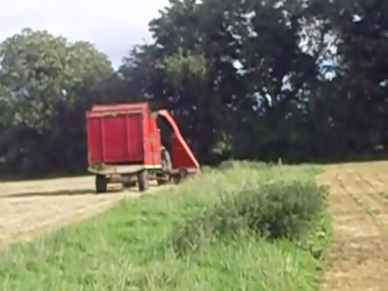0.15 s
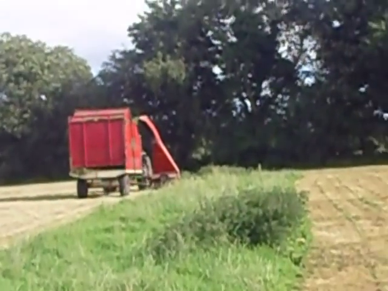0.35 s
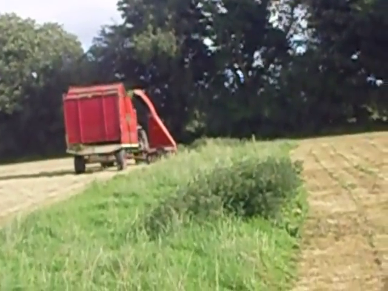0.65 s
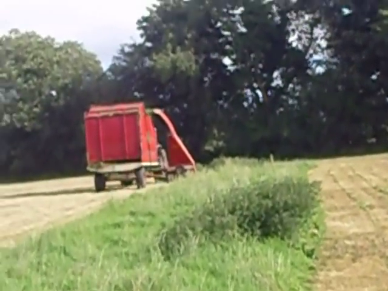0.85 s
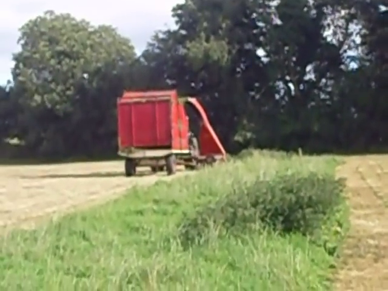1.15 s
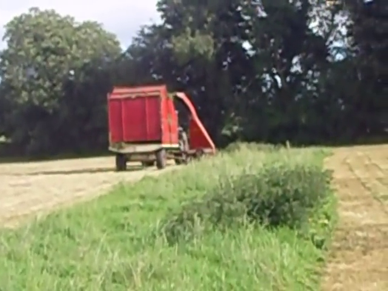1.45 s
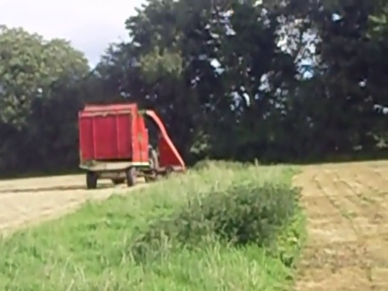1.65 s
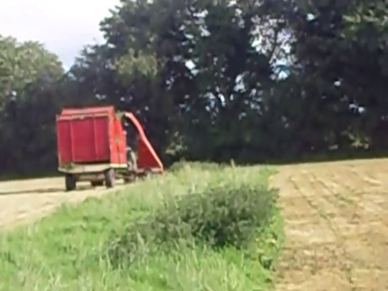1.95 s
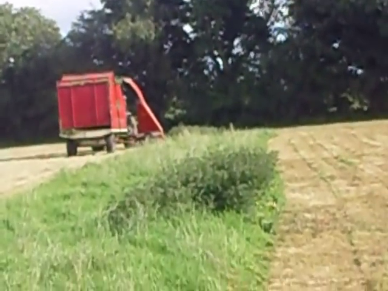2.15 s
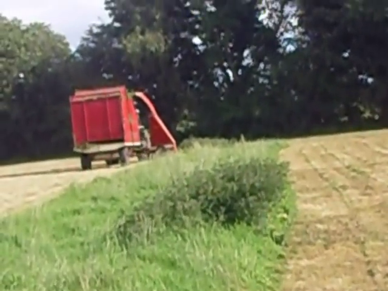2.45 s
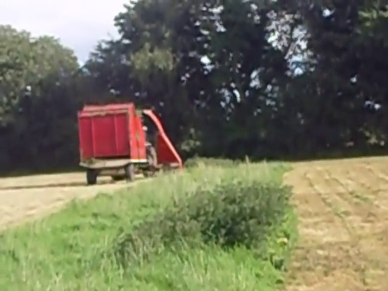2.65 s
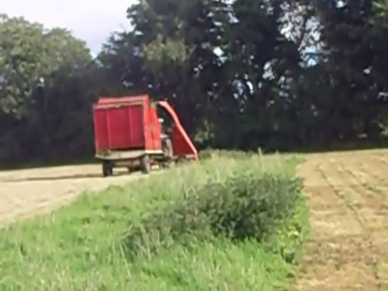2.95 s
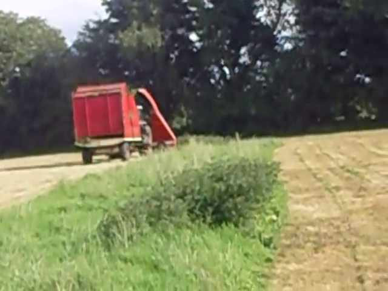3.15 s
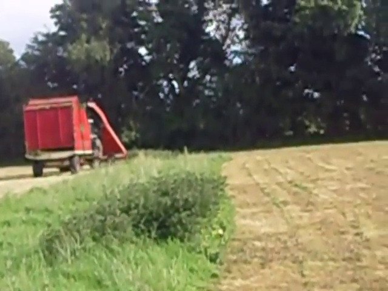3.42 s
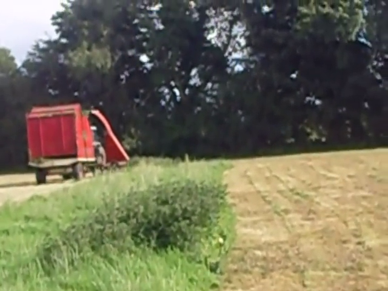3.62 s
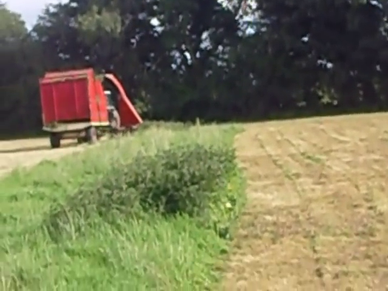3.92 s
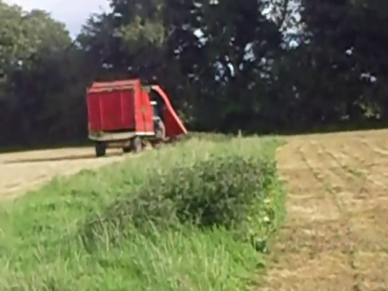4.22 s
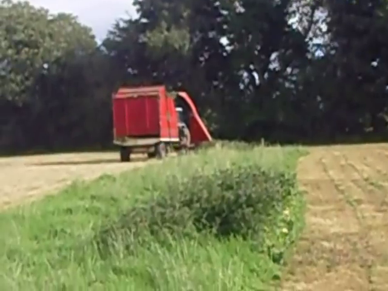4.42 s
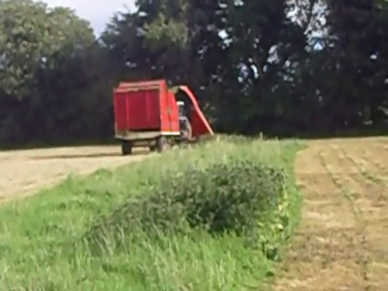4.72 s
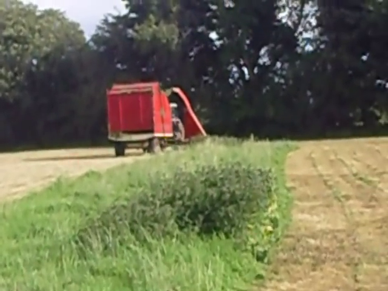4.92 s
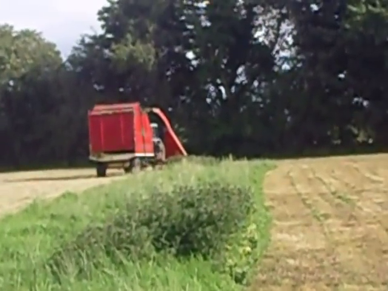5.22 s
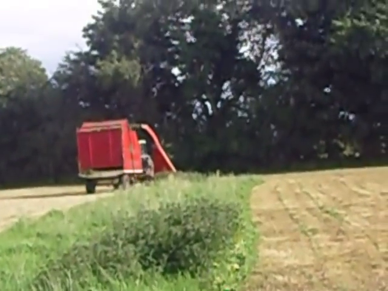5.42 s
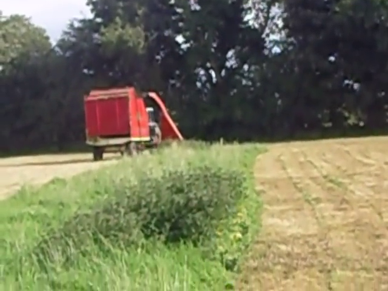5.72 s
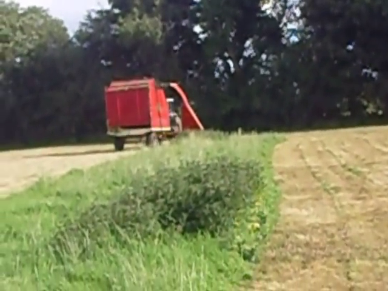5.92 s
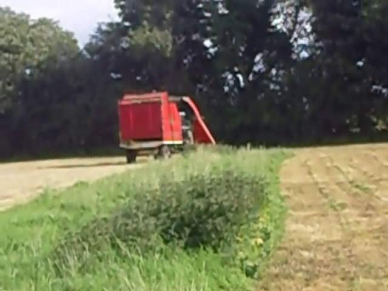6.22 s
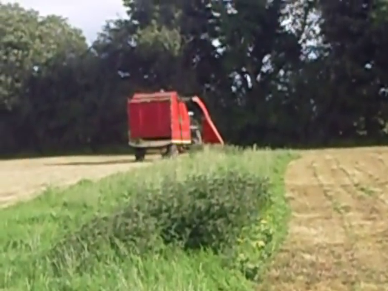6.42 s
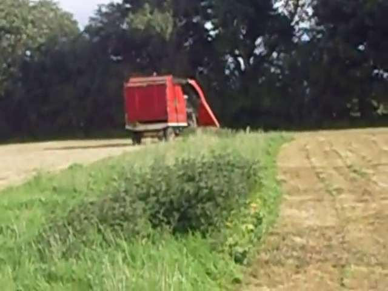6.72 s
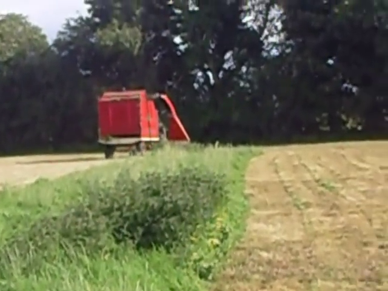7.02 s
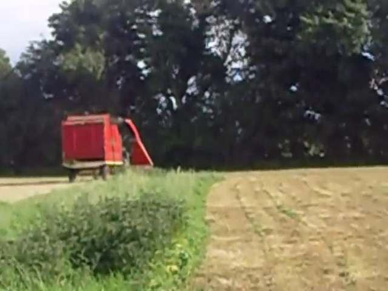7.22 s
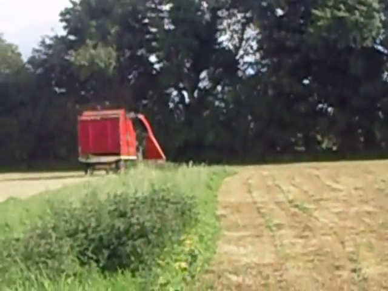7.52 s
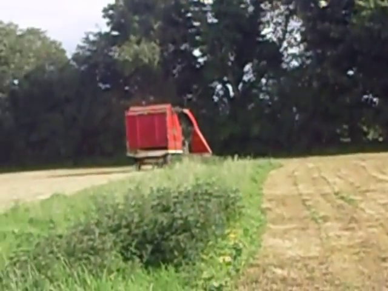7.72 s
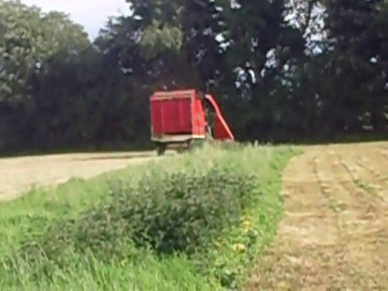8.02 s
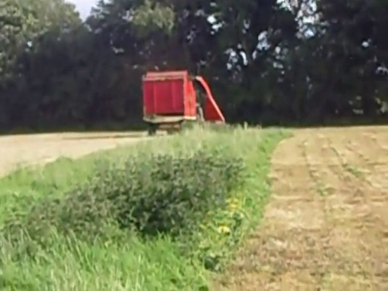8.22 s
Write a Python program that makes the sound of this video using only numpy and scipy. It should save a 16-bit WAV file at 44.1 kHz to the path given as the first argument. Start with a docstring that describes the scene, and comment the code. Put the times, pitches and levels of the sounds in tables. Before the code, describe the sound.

A diesel tractor drones and throbs under load while a harvester roars and hisses, grass slaps a trailer, and wind buffets the microphone.

```python
"""Tractor and forage harvester in a field

A diesel tractor pulls a forage harvester away. Tones tied to the firing rate make the exhaust drone; under load the
drive beats unevenly, and when the crop thins the engine speeds up and runs smooth. Shaped noise makes the rotor's roar,
the hiss of cut grass in the chute, its slaps on the trailer, a low rumble and the light wind on the small microphone.
Something close buzzes briefly at the end, built from a stack of harmonics."""
import sys
import numpy as np
from scipy import signal
from scipy.fft import rfft, irfft, next_fast_len
from scipy.io import wavfile
from scipy.ndimage import uniform_filter1d, map_coordinates

SR = 44100
rng = np.random.default_rng(int(sys.argv[2]) if len(sys.argv) > 2 else 0)


def transcribe(signal):
    """Save signal, clipped to [-1, 1], as a 16-bit WAV file at the path in sys.argv[1]."""
    frames = np.atleast_2d(signal).T
    limited = np.clip(frames, -1, 1)
    pcm = np.round(limited * 32767).astype(np.int16)
    wavfile.write(sys.argv[1], SR, pcm)


N = 369116  # length in samples

# Engine speed. Each row: time in seconds, nominal firing rate in Hz (the main drone lies 1% below it).
ENGINE_SPEED = [(0, 71.7), (1.25, 72.6), (4.6, 72.9), (5.25, 75.2), (6.3, 77.2), (7.25, 77.3), (8, 78.1),
                (8.37, 78.1)]
# Main exhaust sounds. Each row: time in seconds, firing tone in dB, uneven beat in dB.
DRONE_LEVELS = [(0, -24.5, -28), (.3, -24.5, -26.5), (.5, -36, -21), (.8, -32, -23), (1, -24.5, -23.5),
                (1.5, -23, -24), (2, -26, -37), (2.6, -23.5, -25.5), (3, -25, -36), (3.3, -25, -34),
                (3.6, -31.5, -26), (4.1, -27, -32.5), (4.5, -25, -29), (5, -26, -28), (5.5, -31, -34),
                (6, -25.5, -35), (6.8, -29, -48), (8.37, -32, -41)]
# Higher exhaust tones. Each row: multiple of the firing rate, level in dB against the 3rd multiple.
HIGH_MULTIPLES = [(4, -11), (5, -25)]
# Tones of the uneven drive. Each row: frequency in thirds of the firing rate, level in dB against the smoothed beat.
UNEVEN_TONES = [(4, -10), (5, -8.5), (7, -12.5), (8, -15.5), (10, -22), (11, -23.5)]
SECOND_DB, THIRD_DB = -31, -44  # 2nd and 3rd multiples of the firing rate at the start
RECEDE_DB_PER_S = 0.43  # fading of the engine's and rotor's 2nd multiples as the tractor draws away
UNLOADED_S, FREE_DB = 5.37, 2.5  # when the crop thins, and the rise of the 3rd and higher multiples
ROTOR_RATIO = .944  # nominal rotor blade passes for each firing

# Harvester loudness. Each row: time in seconds, roar in dB, whirr in dB, hiss in dB.
HARVESTER_LEVELS = [(0.0, -33, -40.5, -40.5), (0.23, -30, -39.5, -39.5), (0.62, -32.5, -41.5, -42),
                    (0.85, -28, -40.5, -40.5), (0.99, -32, -47, -44), (1.38, -31, -41.5, -41),
                    (1.8, -35, -41.5, -44.5), (2.89, -34.5, -40, -41), (3.81, -36, -38.5, -46),
                    (4.11, -35, -35, -41), (4.32, -34, -40, -43.5), (4.37, -34.5, -38.5, -39),
                    (4.92, -34, -39, -45), (5.02, -38, -43, -47.5), (6.24, -40.5, -42.5, -50),
                    (6.7, -40.5, -45.5, -50.5), (7.28, -40, -43, -50), (7.79, -41, -45.5, -53),
                    (8.28, -41.5, -51.5, -53.5), (8.3, -44.5, -48, -51.5)]
# Tone colour of the rotor's roar. Each row: frequency in Hz, relative level in dB per Hz.
ROAR_COLOUR = [(250, -39), (450, -17), (600, -6), (760, 0.5), (900, -3), (1000, -6.5), (1200, -3),
               (1500, -5.5), (1800, -10), (2600, -31)]
# Tone colour of the whirr. Each row: frequency in Hz, relative level in dB per Hz.
WHIRR_COLOUR = [(1200, -14.5), (1700, -5.5), (1870, -3), (1980, 1.5), (2100, -3.5), (2300, -7), (2700, -11),
                (3600, -22.5)]
# Tone colour of grass hissing up the chute. Each row: frequency in Hz, relative level in dB per Hz.
HISS_COLOUR = [(1800, -33), (2800, -5.5), (3500, -4), (4000, 1), (4500, -3), (6200, -4), (9200, -12),
               (12000, -20), (18500, -30)]

# Wind and low rumble between swells. Each row: time in seconds, buffet in dB, flutter in dB, rumble in dB.
WIND_AND_RUMBLE_LEVELS = [(0, -40, -29.5, -30.5), (1, -39, -29.5, -30.5), (2, -36, -29.5, -33),
                          (3.6, -36, -31.5, -32.5), (4.2, -39, -27.5, -30.5), (5, -40, -34.5, -34.5),
                          (5.6, -38.5, -34.5, -39.5), (6.5, -42, -35.5, -37), (8.37, -35, -37.5, -39.5)]
# Swells. Each row: time of the peak in seconds, rise of the buffet in dB, width in seconds.
GUST_EVENTS = [(.07, 7, .1), (.28, 11, 0.11), (.84, 14, 0.12), (1.24, 12, 0.078), (1.54, 13, .08),
               (2.07, 2, 0.25), (3.8, 2, 0.098), (4.31, 8, .1), (4.5, 13, 0.088), (4.97, 15, 0.18),
               (5.31, 16, 0.11), (5.9, 13, .08), (6.11, 13, .12), (6.48, 3, 0.18), (7.04, 10, 0.14),
               (7.3, 6, 0.33), (7.92, 4, 0.085)]
FLUTTER_SHARE, RUMBLE_SHARE = 0.44, 0.16  # part of a swell's dB rise that reaches these layers
# Tone colour of the wind's buffeting. Each row: frequency in Hz, relative level in dB per Hz.
BUFFET_COLOUR = [(8, -33), (16, -15), (30, 4), (60, -5), (100, -8), (200, -38)]
# Tone colour of the wind's flutter. Each row: frequency in Hz, relative level in dB per Hz.
FLUTTER_COLOUR = [(30, -19), (60, -5), (85, -3), (110, 0), (150, -3.5), (200, -14.5), (300, -43)]
# Tone colour of the low rumble of the machine and trailer. Each row: frequency in Hz, relative level in dB per Hz.
RUMBLE_COLOUR = [(110, -18), (170, 1), (200, -1.5), (250, -6), (290, -11), (340, -20), (450, -26),
                 (600, -43)]

# Clumps hitting sheet metal. Each row: time in seconds, splash strength in dB, body strength in dB.
SLAP_EVENTS = [(0.6249, -37, -33), (1.3544, -39, -24.5), (1.496, -35.5, -32), (2.8205, -39.5, -33),
               (3.2111, -36, -36), (3.2779, -35, -36), (3.8761, -37, -30), (3.9779, -39.5, -25),
               (4.2617, -33.5, -28), (4.341, -36, -34), (4.375, -30, -29), (4.4333, -28.5, -28),
               (4.4994, -35, -28), (4.5994, -38.5, -31), (4.6404, -35, -25), (5.1394, -43, -33),
               (5.5209, -42, -31), (6.7471, -37, -31), (6.8987, -38, -33.5), (7.0194, -41, -33),
               (7.182, -39, -35), (7.2199, -38, -37), (7.3694, -39.5, -38)]
# Tone colour of a slap's splash. Each row: frequency in Hz, relative level in dB per Hz.
SPLASH_COLOUR = [(1500, -15), (2500, -1), (4000, 2.5), (6500, -2.5), (9500, -18), (14000, -40)]
# Tone colour of a slap's duller body. Each row: frequency in Hz, relative level in dB per Hz.
BODY_COLOUR = [(500, -25), (750, -1), (1300, -2), (2000, 1), (2600, -14), (3600, -25)]
SMALL_SLAPS_PER_S = 3
SMALL_SLAP_DB = 2.5  # least strength of a small slap over the hiss

# Wind pops. Each row: time in seconds, strength in dB.
POP_EVENTS = [(0.862, -20.5), (1.116, -18.5), (1.75, -20.5), (5.324, -22), (5.896, -20.5), (5.94, -21),
              (6.099, -9), (7.513, -18.5)]

# The close buzz. One row: start in seconds, end in seconds, pitch in Hz.
BUZZ_EVENT = (8.328, 8.362, 660)
# Harmonics of the buzz, from its pitch upward. Each entry: peak level in dB, before the wavering.
BUZZ_HARMONICS = [-50, -41, -52, -49, -52, -51, -57, -54, -58, -56, -66, -61, -56]

# Microphone housing. Each row: centre in Hz, width in Hz, change of level in dB.
HOUSING_NOTCHES = [(3096, 110, -14), (7600, 480, -6), (10520, 550, -7.5), (13600, 800, 0)]
# Whine of the electronics. Each row: frequency in Hz, rms level in dB.
WHINE_TONES = [(15735, -91)]
TOP_HZ = 17200  # nothing passes from here up


def amp(db):
    """Turn a level in dB into a gain."""
    return 10 ** (np.asarray(db) / 20)


def unit(x):
    """Scale x to an rms of 1."""
    return x / np.sqrt(np.mean(x ** 2) + 1e-20)


def seconds():
    """The time of every sample."""
    return np.arange(N) / SR


def curves(rows):
    """Join the rows by straight lines: one curve for each column after the time."""
    times, *columns = np.transpose(rows)
    return [np.interp(seconds(), times, column) for column in columns]


def wobble(rate):
    """A smooth curve through random values, rate of them a second."""
    knots = rng.standard_normal(int(N * rate / SR) + 4)
    return map_coordinates(knots, [np.arange(N) * rate / SR])


def white():
    """White noise, equally strong at every frequency."""
    return rng.standard_normal(N)


def filtered(x, response):
    """Multiply the frequencies of x by a response."""
    size = next_fast_len(N + SR // 2)
    spectrum = rfft(x, size) * response(np.fft.rfftfreq(size, 1 / SR))
    return irfft(spectrum, size)[..., :N]


def coloured(x, colour):
    """Shape x by points joined on a log frequency axis, all but silent outside them, at an rms of 1."""
    freqs, db = np.transpose(colour)

    def response(hz):
        return amp(np.interp(np.log(hz + 1), np.log(freqs + 1), db, -120, -120))

    return unit(filtered(x, response))


def patchy(depth_db):
    """White noise whose gain drifts in small and in broad patches of time and pitch."""
    grid = signal.stft(white(), nperseg=512)[2]

    def field(wide, long):
        across_pitch = uniform_filter1d(rng.standard_normal(grid.shape), wide, axis=0)
        return unit(uniform_filter1d(across_pitch, long, axis=1))

    patches = field(6, 6) + .3 * field(24, 20)
    return signal.istft(grid * amp(depth_db * patches), nperseg=512)[1][:N]


def tone(multiple, turns, drift, waver_db):
    """A sine at a multiple of a turning rate, its phase and level unsettled by the air on the way."""
    phase = 2 * np.pi * (multiple * turns + rng.random()) + drift * multiple * wobble(6)
    return np.sqrt(2) * amp(waver_db * wobble(7)) * np.sin(phase)


def at_times(times, db, shape):
    """Place a copy of one shape at each time, with its own strength."""
    marks = np.bincount(np.round(times * SR).astype(int), amp(db), N)
    return signal.fftconvolve(marks, shape)[:N]


def bursts(times, db, rise, t60):
    """A loudness curve with a quick swell at each time, its decay losing 60 dB in t60 seconds."""
    t = np.arange(SR // 8) / SR
    return np.abs(at_times(times, db, (1 - np.exp(-t / rise)) * amp(-60 * t / t60)))


def engine(firings):
    """Exhaust tones follow the firings; load brings a beat at two thirds of their rate and tones between."""
    first_db, beat_db = curves(DRONE_LEVELS)
    second_db = SECOND_DB - RECEDE_DB_PER_S * seconds()
    freed = np.clip((seconds() - UNLOADED_S) / .3, 0, 1)  # the load comes off over 0.3 s
    third_db = THIRD_DB + FREE_DB * freed

    drone = amp(first_db) * tone(0.99, firings, .05, waver_db=0.84)
    drone += amp(second_db) * tone(2, firings, .04, waver_db=1.4)
    drone += amp(third_db) * tone(3, firings, .04, waver_db=1.2)
    high = sum(amp(db) * tone(k, firings, .08, waver_db=3.5) for k, db in HIGH_MULTIPLES)
    drone += amp(third_db) * high

    beat = amp(beat_db) * tone(2 / 3, firings, .08, waver_db=1.2)
    between = sum(amp(db) * tone(k / 3, firings, .1, waver_db=2.5) for k, db in UNEVEN_TONES)
    smooth_beat_db = uniform_filter1d(beat_db, size=SR)  # averaged over one second
    return drone + beat + amp(smooth_beat_db) * between


def rotor(firings):
    """The blades pass a little slower than the firings, so the drone throbs against them."""
    passes = ROTOR_RATIO * firings
    low_db = uniform_filter1d(curves(DRONE_LEVELS)[0], size=SR) - 8.5
    low = amp(low_db) * tone(0.98, passes, .15, waver_db=2.5)
    second_db = -36.5 - RECEDE_DB_PER_S * seconds()
    return low + amp(second_db) * tone(2, passes, 0.14, waver_db=1.5)


def harvester(firings):
    """Noises that pulse with the firings and swell together as wads of grass pass."""
    roar_db, whirr_db, hiss_db = curves(HARVESTER_LEVELS)
    pulse = np.cos(2 * np.pi * firings + 0.54 * wobble(5))
    wads = wobble(40) + .6 * wobble(14)

    roar_swell = amp(0.72 * wads)
    roar = coloured(patchy(depth_db=0.6) * (1 + 0.17 * pulse) * roar_swell, ROAR_COLOUR)
    whirr_swell = amp(1.17 * wads + 0.61 * wobble(9))
    whirr = coloured(patchy(depth_db=0.13) * (1 + 0.14 * pulse) * whirr_swell, WHIRR_COLOUR)
    hiss_swell = amp(0.64 * wads + 0.77 * wobble(200))
    hiss = coloured(patchy(depth_db=0.93) * (1 + 0.1 * pulse) * hiss_swell, HISS_COLOUR)
    return amp(roar_db) * roar + amp(whirr_db) * whirr + amp(hiss_db) * hiss


def wind_and_rumble():
    """Wind buffets and low rumble: three bands of noise that swell, the lowest most."""
    buffet_db, flutter_db, rumble_db = curves(WIND_AND_RUMBLE_LEVELS)
    t = seconds()
    gust_db = sum(db * np.exp(-(2 * (t - peak) / width) ** 2) for peak, db, width in GUST_EVENTS)
    buffet_db = buffet_db + gust_db + 3.0 * wobble(8.8)
    flutter_db = flutter_db + FLUTTER_SHARE * gust_db + 0.97 * wobble(12)
    rumble_db = rumble_db + RUMBLE_SHARE * gust_db + .9 * wobble(12)

    buffet = amp(buffet_db) * coloured(white(), BUFFET_COLOUR)
    flutter = amp(flutter_db) * coloured(white(), FLUTTER_COLOUR)
    rumble = amp(rumble_db) * coloured(white(), RUMBLE_COLOUR)
    return buffet + flutter + rumble


def slaps():
    """Each clump of grass is a short splash of noise with a duller body; small ones land at random."""
    times, splash_db, body_db = np.transpose(SLAP_EVENTS)
    place, size = rng.random((int(SMALL_SLAPS_PER_S * N / SR), 2)).T
    small_at = place * (N - 1)  # in samples
    hiss_db = curves(HARVESTER_LEVELS)[2][small_at.astype(int)]
    small_db = hiss_db + SMALL_SLAP_DB + 6 * size  # up to 6 dB stronger at random

    times = np.r_[times, small_at / SR]
    splash_db = np.r_[splash_db, small_db]
    body_db = np.r_[body_db, small_db]
    splash = bursts(times, splash_db, rise=0.00095, t60=0.05) * coloured(white(), SPLASH_COLOUR)
    body = bursts(times, body_db, rise=0.0016, t60=0.054) * coloured(white(), BODY_COLOUR)
    return splash + body


def wind_pops():
    """Sharp pops of wind: the microphone's diaphragm snaps out and back, with a short rattle."""
    times, db = np.transpose(POP_EVENTS)
    t = np.arange(SR // 10) / SR

    def sine(hz):
        return np.sin(2 * np.pi * hz * t)

    push = np.tanh(3 * sine(52)) * amp(-60 * t / .09)  # tanh flattens the swings
    push += .6 * sine(175) * amp(-60 * t / .06)
    swell = t / 0.0067 * np.exp(1 - t / 0.0058)  # the rattle peaks as the diaphragm snaps back
    push += swell * (0.19 * sine(370) + 0.054 * sine(600))
    push *= 1 - np.exp(-t / .0008)  # soften the very start
    return at_times(times, db, push)


def buzz():
    """A brief buzz close by: harmonics of one pitch, each made rough by fast changes of level."""
    start, end, pitch_hz = BUZZ_EVENT
    t = seconds()
    on = np.clip(np.minimum(t - start, end - t) / 0.0046, 0, 1)  # 4.6 ms fades
    total = np.zeros(N)
    for multiple, db in enumerate(BUZZ_HARMONICS, start=1):
        harmonic = tone(multiple, pitch_hz * t, 0, waver_db=0) / np.sqrt(2)
        total += amp(db) * harmonic * amp(2.5 * wobble(150))
    return on * total


def scene():
    """Add the machine, wind, rumble and buzz together on one channel."""
    firings = np.cumsum(curves(ENGINE_SPEED)[0]) / SR  # running count at the nominal rate
    machine = engine(firings) + rotor(firings) + harvester(firings) + slaps()
    return (machine + wind_and_rumble() + wind_pops() + buzz())[None]


def record(dry):
    """Add the housing's notches, amplifier hiss and a faint whine, then cut off the highest treble."""
    def housing(hz):
        return amp(sum(db / (1 + ((hz - centre) / width * 2) ** 2) for centre, width, db in HOUSING_NOTCHES))

    hiss = amp(-59.0) * coloured(white(), [(3000, 8), (10000, -11), (19000, -9)])  # Hz, relative dB
    whine = sum(np.sqrt(2) * amp(db) * np.sin(2 * np.pi * hz * seconds()) for hz, db in WHINE_TONES)
    return filtered(filtered(dry, housing) + hiss + whine, lambda hz: hz < TOP_HZ)


dry = scene()
out = record(dry)
transcribe(out)
```